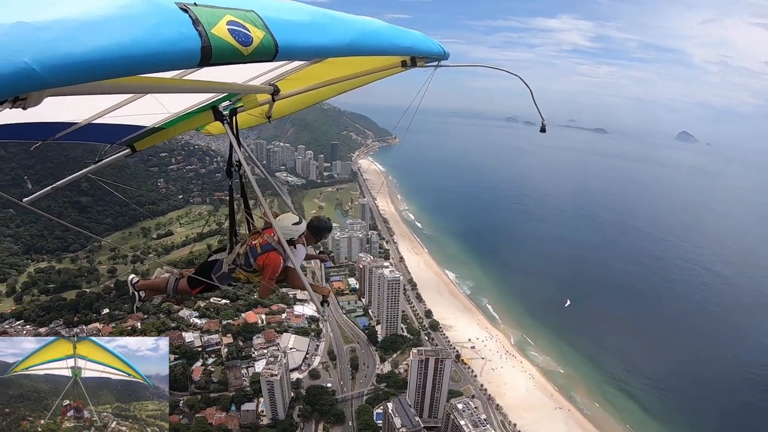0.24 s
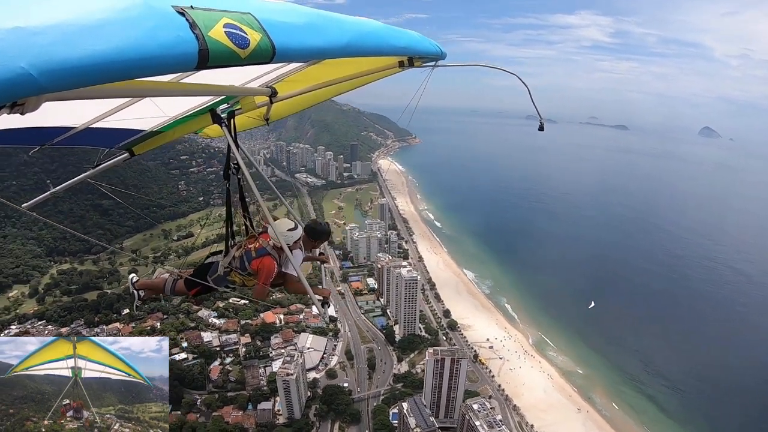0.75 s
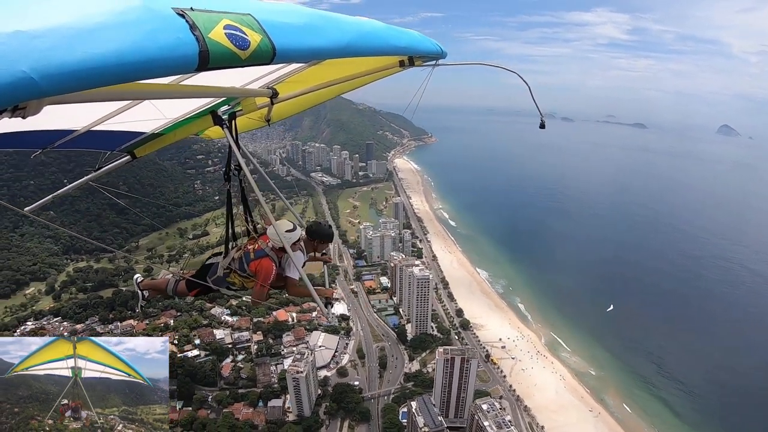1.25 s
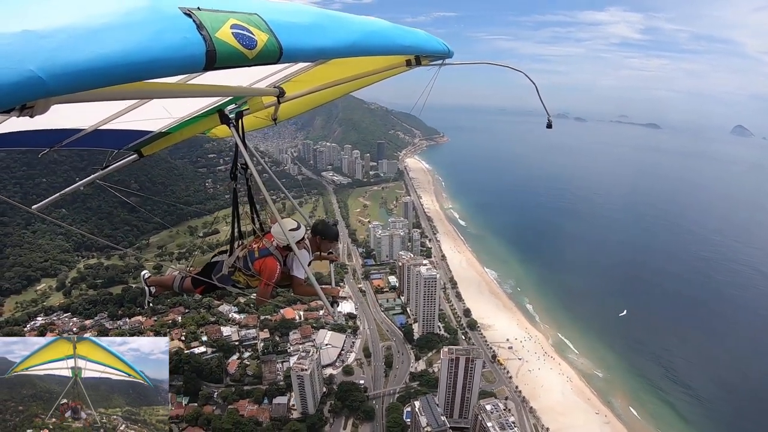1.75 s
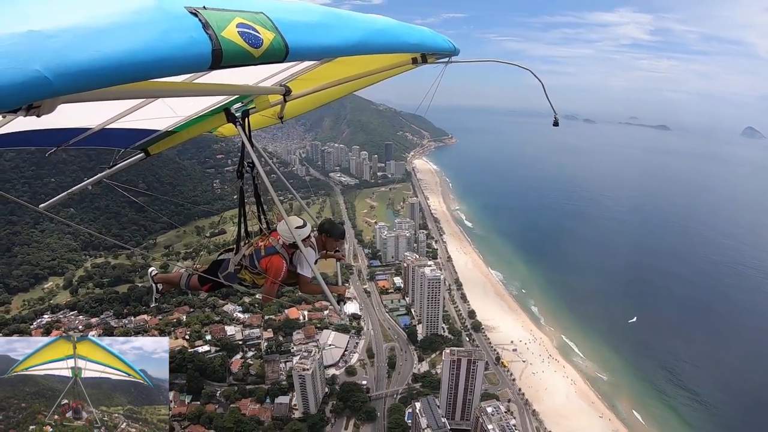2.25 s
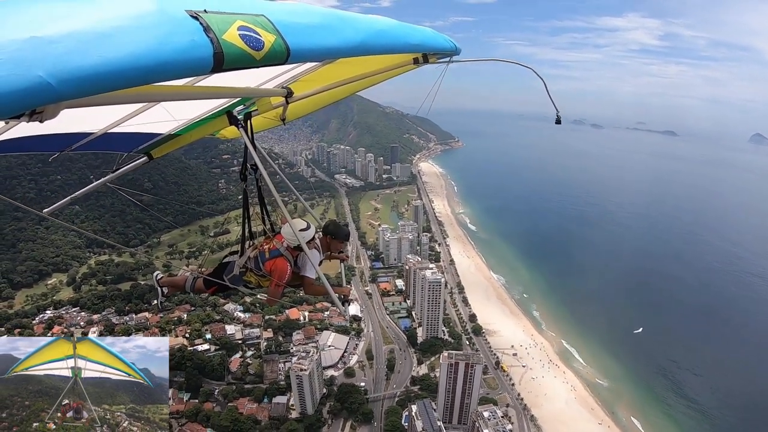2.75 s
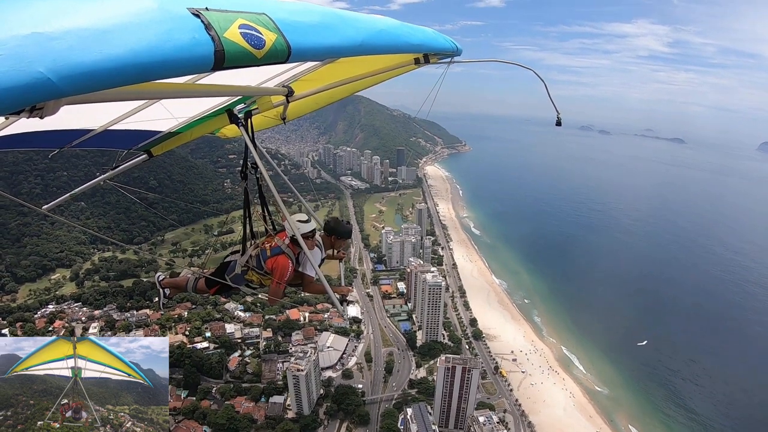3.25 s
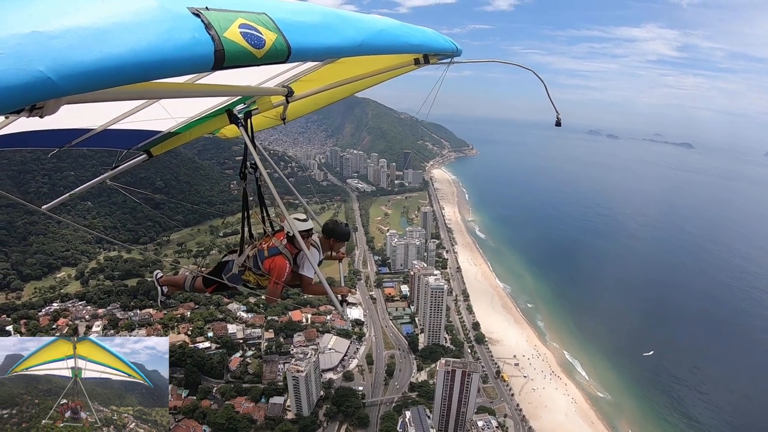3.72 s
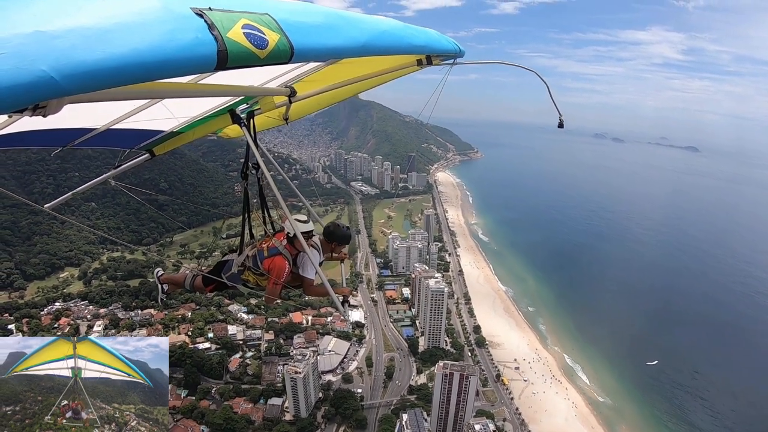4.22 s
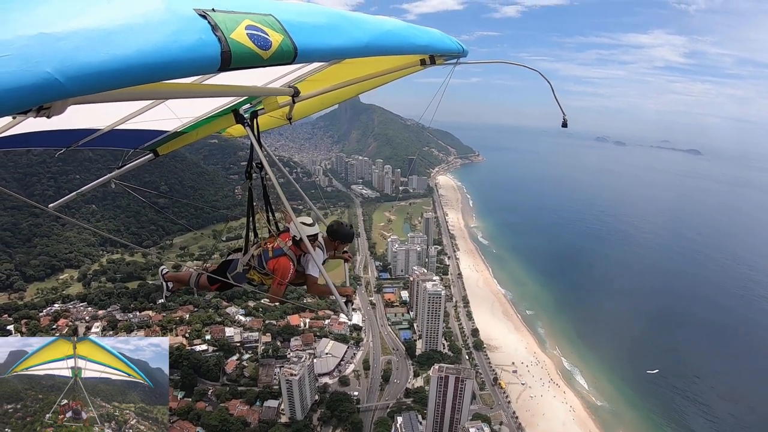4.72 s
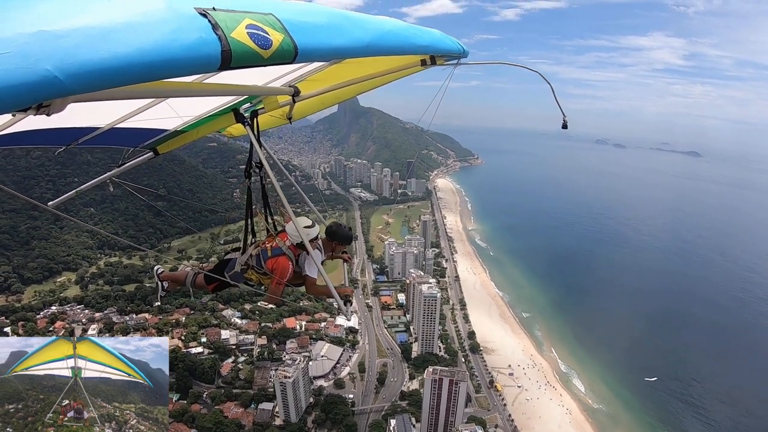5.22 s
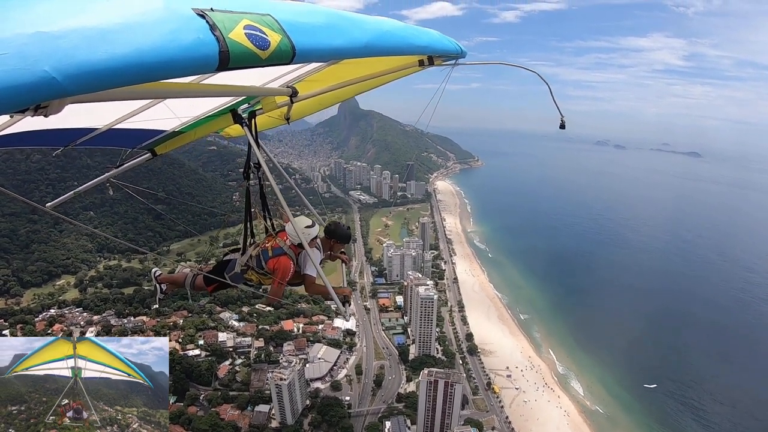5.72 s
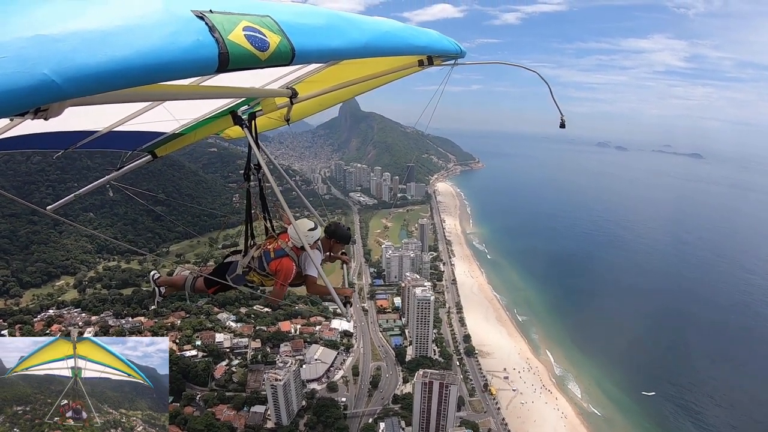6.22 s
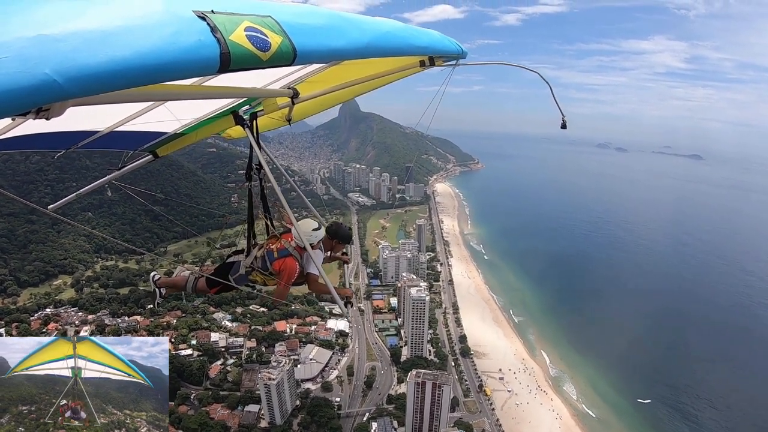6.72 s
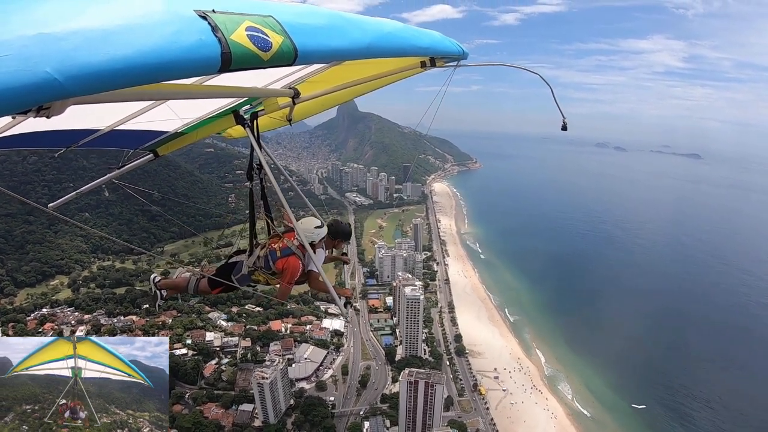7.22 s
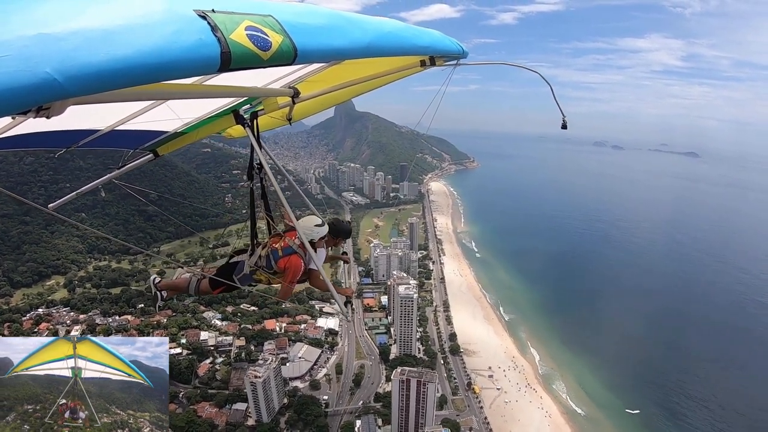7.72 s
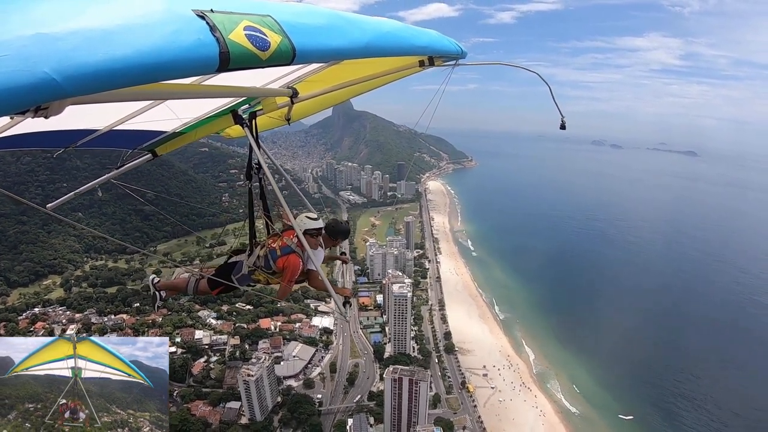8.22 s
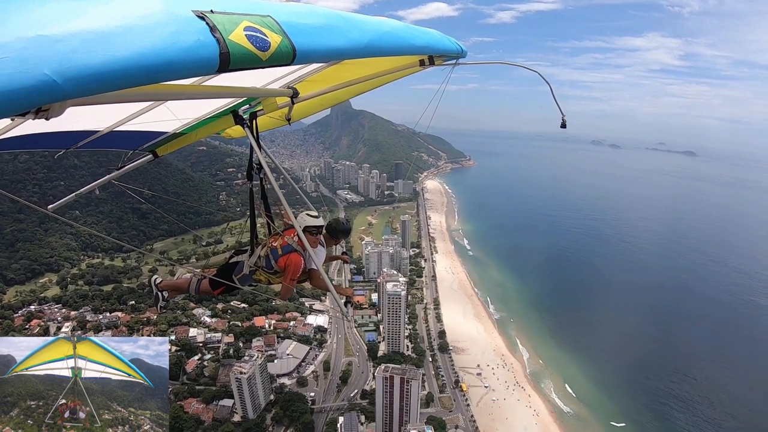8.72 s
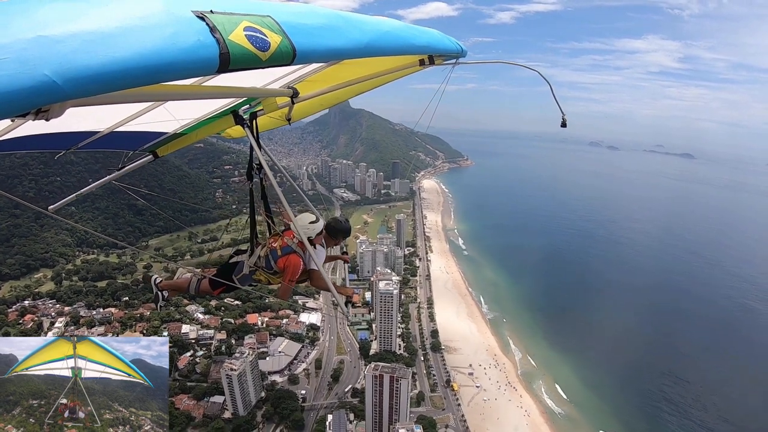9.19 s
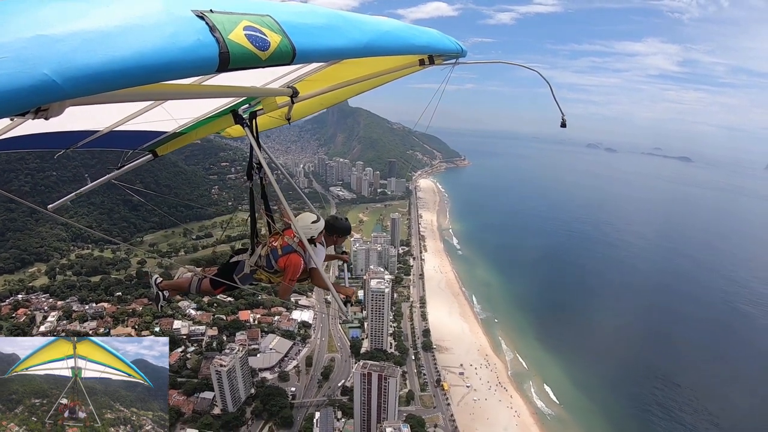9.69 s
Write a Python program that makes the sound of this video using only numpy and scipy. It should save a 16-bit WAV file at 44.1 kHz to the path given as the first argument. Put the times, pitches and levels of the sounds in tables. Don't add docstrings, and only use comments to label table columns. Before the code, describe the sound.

Steady airflow over a hang glider's camera: deep fluttering rumble, faint hiss, rough mid-high fluttering puffs and irregular short snaps throughout.

```python
import sys
import numpy as np
from scipy import signal
from scipy.fft import rfft, irfft, next_fast_len
from scipy.io import wavfile
from scipy.ndimage import uniform_filter1d

SR = 44100
rng = np.random.default_rng(int(sys.argv[2]) if len(sys.argv) > 2 else 0)


def makeup_ratio(level_db):
    decades = np.asarray(level_db, float) / 20
    return 10 ** decades


def log_audio(samples):
    frames = np.atleast_2d(samples).T
    limited = np.clip(frames, -1, 1)
    pcm = np.round(limited * 32767).astype(np.int16)
    wavfile.write(sys.argv[1], SR, pcm)


N = 438794
TIME_S = np.arange(N) / SR


def rms_one(x):
    return x / np.sqrt(np.mean(x ** 2) + 1e-20)


def even_out(x, window, strength):
    level = np.sqrt(uniform_filter1d(x ** 2, size=window))
    return x / level ** strength


def coloured(spectrum):
    hz, level_db = np.transpose(spectrum)
    size = next_fast_len(N)
    log_hz = np.log(np.arange(size // 2 + 1) * SR / size + 1e-3)
    gain = makeup_ratio(np.interp(log_hz, np.log(hz), level_db))
    return irfft(rfft(rng.standard_normal(size)) * gain, size)[:N]


def drift(rate_hz):
    r = np.exp(-2 * np.pi * rate_hz / SR)
    slow = signal.lfilter([1], [1, -2 * r, r * r], rng.standard_normal(N + SR))
    return rms_one(slow[SR:])


def resonate(x, hz, width_hz):
    r = np.exp(-np.pi * width_hz / SR)
    poles = [1, -2 * r * np.cos(2 * np.pi * hz / SR), r * r]
    return signal.lfilter([(1 - r * r) / 2, 0, (r * r - 1) / 2], poles, x)


def sing(hz):
    return np.sin(2 * np.pi * np.cumsum(hz) / SR)


# centre in seconds, swell in dB, length in seconds.
GUSTS = [(0.15, 3, .2), (0.903, 2, 0.049), (2.0, 3.5, 0.17), (2.7, 2, 0.093), (5.2, 4.5, 0.3),
         (6.107, 7, 0.065), (6.7, 2.5, 0.54), (7.3, 1, .15), (7.795, 4, 0.087), (8.205, 3.5, 0.34),
         (9.05, 2, 0.12), (9.927, 4.5, 0.11)]


def gusts():
    return sum(swell_db * np.exp(-((TIME_S - s) / length_s) ** 2) for s, swell_db, length_s in GUSTS)


# frequency in Hz, level in dB per Hz.
RUMBLE = [(8.8, -31.5), (15, -4.5), (48, 2), (117, -1), (471, -16.5), (946, -31), (1200, -30.5),
          (1560, -36), (2640, -120)]


def rumble(deep_db, upper_db):
    push = coloured(RUMBLE)
    split_hz = 110
    deep = signal.sosfiltfilt(signal.butter(2, split_hz, fs=SR, output="sos"), push)
    upper = push - deep
    deep = even_out(deep, SR // 25, 0.16)
    stroke = 5.2
    deep = stroke * np.tanh(rms_one(deep) / stroke)
    upper = stroke * np.tanh(rms_one(upper) / stroke)
    return makeup_ratio(deep_db) * deep + makeup_ratio(upper_db) * upper


# frequency in Hz, level in dB per Hz.
HISS = [(300, -18.5), (700, 2.5), (1000, -5), (1800, -5.5), (2600, -14.5), (3400, -15), (5200, -17),
        (6500, -22), (8100, -30.5), (9000, -37)]


def hiss(flow):
    level = makeup_ratio(-47.5 + 0.39 * drift(60))
    return level * rms_one(flow) ** 0.095 * rms_one(coloured(HISS))


# start in seconds, end in seconds, pitch in Hz, level in dB.
WHISTLE = (7.06, 7.3, 5310, -70)


def whistle():
    start_s, end_s, hz, level_db = WHISTLE
    fade_s = 0.03
    swell = np.interp(TIME_S, [start_s - fade_s, start_s, end_s, end_s + fade_s], [0, 1, 1, 0])
    wavering_hz = hz + 15 * drift(20)
    return makeup_ratio(level_db + 2 * drift(15)) * swell * np.sqrt(2) * sing(wavering_hz)


# time in seconds, level in dB, cavity pitch in Hz.
LEAK = [(0.0, -47.5, 2566), (0.22, -50, 2600), (0.47, -43, 2530), (2.24, -42, 2570), (3.27, -46, 2653),
        (3.55, -42, 2578), (4.07, -43, 2512), (4.88, -43, 2488), (5.04, -48.5, 2500), (6.54, -48, 2467),
        (6.93, -50.5, 2519), (7.45, -44.5, 2613), (7.81, -51, 2507), (8.04, -51, 2545), (8.76, -47.5, 2630),
        (9.12, -49.5, 2612), (9.45, -45.5, 2610), (9.95, -49, 2590)]


def leak():
    s, level_db, pitch_hz = np.transpose(LEAK)
    return np.interp(TIME_S, s, level_db), np.interp(TIME_S, s, pitch_hz)


# centre in seconds, level in dB, length in ms.
PUFFS = [(0.226, -42.5, 45), (0.333, -38.5, 34), (0.455, -40, 20), (0.822, -40, 21), (2.355, -42, 33),
         (2.543, -38, 12), (2.875, -36, 11), (3.249, -39, 25), (3.313, -36, 13), (3.416, -40, 22),
         (3.595, -40, 84), (5.183, -41.5, 21), (5.69, -41, 40), (5.861, -43.5, 26), (6.082, -41, 24),
         (6.4, -42, 40), (7.214, -39.5, 24), (7.38, -41.5, 90), (7.641, -39, 12), (7.866, -41, 32),
         (7.954, -42.5, 38), (8.06, -39.5, 20), (8.287, -40.5, 13), (8.415, -41.5, 44), (8.728, -40.5, 50),
         (8.851, -38.5, 10), (8.911, -38, 34), (9.464, -39.5, 11), (9.608, -40.5, 36), (9.765, -42, 15)]


def all_puffs(leak_swing_db):
    gap, size, length = rng.standard_normal((340, 3)).T
    s = np.cumsum(0.033 * np.exp(0.4 * gap))
    strong_s, _, strong_ms = np.transpose(PUFFS)
    apart = np.abs(s[:, None] - strong_s) > strong_ms / 2000 + 0.015
    clear = apart.all(axis=1) & (s < N / SR)
    swing_db = np.interp(s, TIME_S, leak_swing_db)
    level_db = -42 + 0.19 * swing_db + 2 * np.clip(size, -2, 1)
    length_ms = 13 * np.exp(0.45 * np.clip(length, -2, 1.2))
    common = np.transpose([s, level_db, length_ms])
    return PUFFS + common[clear].tolist()


def inflow(leak_db, puffs):
    power = makeup_ratio(leak_db - 1.0) ** 2
    span = np.arange(-3000, 3000)
    for s, level_db, length_ms in puffs:
        at = np.clip(round(s * SR) + span, 0, N - 1)
        half = 0.5 * length_ms * SR / 1000
        power[at] += makeup_ratio(level_db + 1.5) ** 2 * np.exp(-np.abs(span / half) ** 4.3)
    return np.sqrt(power)


# centre in seconds, length in seconds.
LULLS = [(0.036, 0.058), (0.146, 0.023), (0.289, 0.014), (3.72, 0.028), (5.567, 0.023), (5.968, 0.02),
         (6.043, 0.03), (6.245, .03), (7.078, 0.023), (7.517, 0.026), (8.007, 0.022), (8.216, 0.028),
         (8.79, 0.033), (9.058, 0.025), (9.196, .02), (9.387, .025), (9.677, 0.024)]


def lulls():
    return makeup_ratio(-5 * sum(np.exp(-((TIME_S - s) / length_s) ** 4) for s, length_s in LULLS))


def crackle(flow):
    sizes = makeup_ratio(5.2 * np.minimum(rng.exponential(1, N), 3.2)) * rng.choice([-1, 1], N)
    snaps_per_s = 450
    clicks = sizes * (rng.random(N) < snaps_per_s / SR) + 1e-18
    dealt = rng.integers(0, 6, N)
    rings = np.zeros(N)
    for k, hz in enumerate(np.geomspace(520, 2200, num=6)):
        width_hz = 0.59 * hz
        rings += resonate(resonate(clicks * (dealt == k), hz, width_hz), hz, width_hz)
    return makeup_ratio(-6.0) * flow * rms_one(rings)


# start in seconds, peak in dB, pitch in Hz.
POPS = [(0.099, -22.5, 2020), (0.6914, -26, 1650), (0.9101, -18, 2160), (0.9756, -27, 1635),
        (1.262, -25, 2070), (1.4272, -22, 2042), (1.6025, -18.5, 2132), (1.7639, -24, 2107),
        (2.6135, -28, 2250), (3.5536, -24, 1730), (3.9596, -22, 2050), (4.0183, -25, 1680),
        (4.1909, -16, 2400), (4.5314, -19.5, 2060), (4.6163, -29, 2190), (4.7631, -19, 2020),
        (4.781, -18, 2310), (4.9963, -23, 1970), (5.379, -23, 1910), (6.361, -20.5, 1880),
        (6.4522, -25, 2350), (6.534, -25.5, 1420), (6.898, -27, 2270), (7.207, -25, 1830),
        (7.7453, -20, 1930), (7.7702, -20, 2370), (8.1693, -24, 2260), (8.322, -27, 2220),
        (9.2542, -24, 1330), (9.7632, -30, 1280)]


def all_pops(puffs):
    s = np.transpose(puffs)[0][len(PUFFS)::5]
    size, pitch = rng.random((100, 2))[:len(s)].T
    peak_db = -38.5 + 8 * size
    hz = 1090 + pitch * (2400 - 1090)
    return POPS + list(zip(s, peak_db, hz))


def pops(rows):
    out = np.zeros(N + SR)
    chance = rng.random((len(rows), 2))
    t = np.arange(400) / SR
    for (s, peak_db, hz), (turn, span) in zip(rows, chance):
        rise_s = (1.1 + 1.1 * span) / hz
        shape = t / rise_s * np.exp(1 - t / rise_s)
        burst = shape ** 4.5 * np.sin(2 * np.pi * (hz * t + turn))
        at = round(s * SR)
        out[at:at + len(t)] += makeup_ratio(peak_db - 4.0) * burst
    return out[:N]


# frequency in Hz, width in Hz, level in dB.
CAVITY = [(2625, 580, 9), (2230, 2200, 4), (1540, 340, -4.5)]


def cavity(flow, pitch_hz):
    eddy = drift(119.9)
    sag = np.maximum(eddy, 0) ** 2
    note_hz = pitch_hz * (1.025 + 0.03 * drift(70.1) + 0.0487 * np.tanh(drift(379)) - 0.04 * sag)
    note = makeup_ratio(2.7 * eddy + 14.0 * np.tanh(drift(410))) * sing(note_hz)
    note = even_out(note, SR // 80, 0.96)
    grains = rng.standard_normal(N) * makeup_ratio(6 * np.tanh(drift(200)))
    rung = np.zeros(N)
    for hz, width_hz, mode_db in CAVITY:
        rung += makeup_ratio(mode_db) * resonate(resonate(grains, hz, width_hz), hz, width_hz)
    rung = even_out(rung, SR // 80, 0.4)
    return flow * makeup_ratio(-3.0) * (rms_one(note) + rms_one(rung))


def scene():
    leak_db, pitch_hz = leak()
    leak_swing_db = leak_db - leak_db.mean()
    puffs = all_puffs(leak_swing_db)
    flow = inflow(leak_db, puffs) * lulls()
    wind = rumble(-32.0 + gusts(), -32.5 + 0.26 * leak_swing_db)
    port = crackle(flow) + pops(all_pops(puffs)) + cavity(flow, pitch_hz)
    port_cut_hz = 2926
    port = signal.sosfilt(signal.butter(4, port_cut_hz, fs=SR, output="sos"), port)
    mix = wind + hiss(flow) + whistle() + port
    return mix[None]


def roll_off(x):
    return signal.sosfilt(signal.butter(12, 8170, fs=SR, output="sos"), x)


def record(dry):
    return roll_off(dry)


dry = scene()
out = record(dry)
log_audio(out)
```